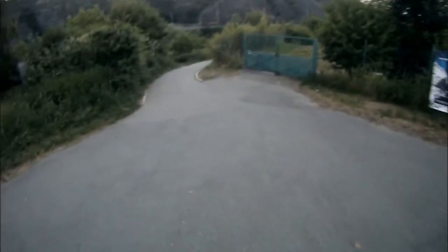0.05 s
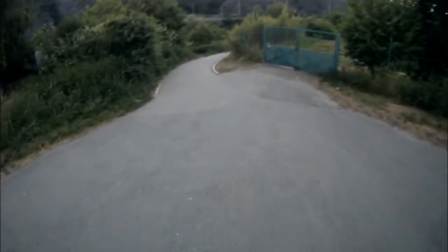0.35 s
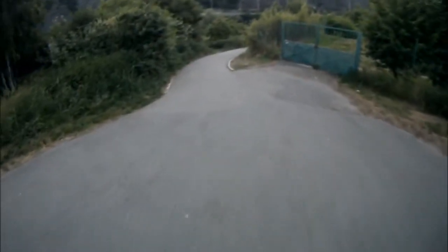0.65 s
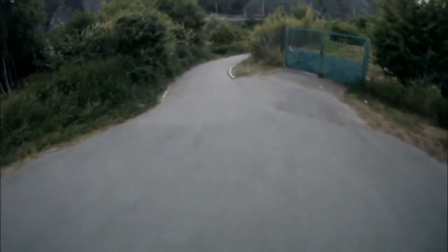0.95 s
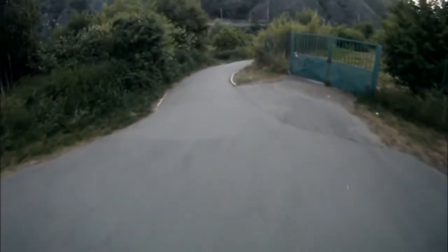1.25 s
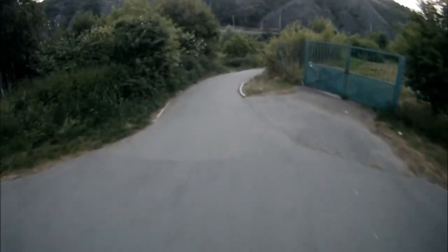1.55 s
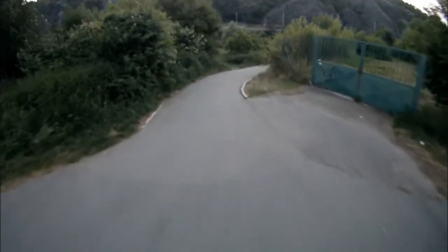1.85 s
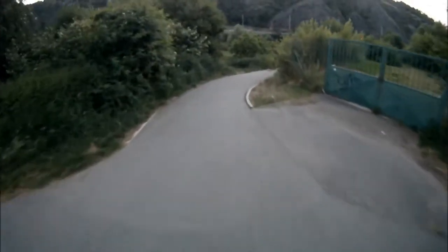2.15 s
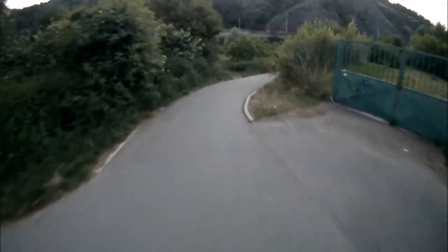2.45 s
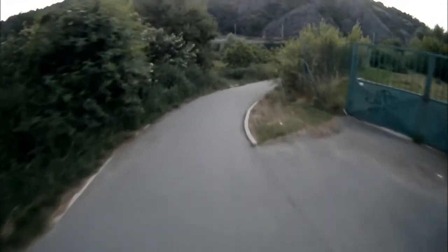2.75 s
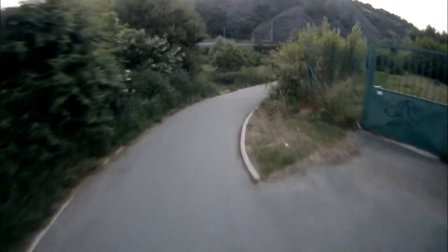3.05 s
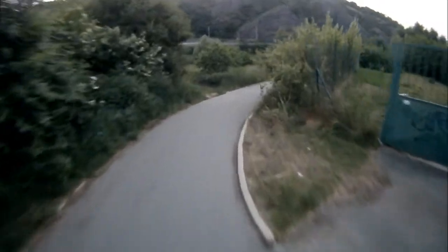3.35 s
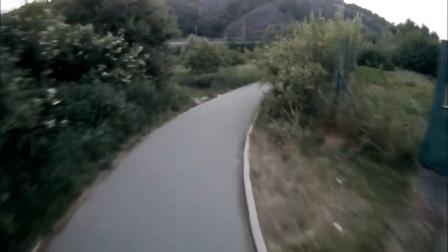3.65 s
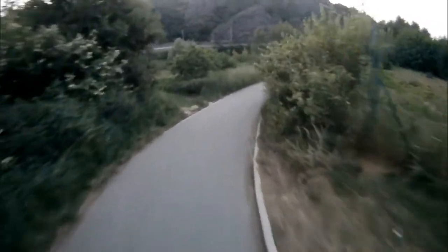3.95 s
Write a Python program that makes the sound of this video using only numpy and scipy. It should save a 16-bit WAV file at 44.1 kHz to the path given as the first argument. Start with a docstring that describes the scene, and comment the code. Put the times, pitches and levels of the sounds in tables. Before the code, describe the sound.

Skate wheels roll along an outdoor asphalt path, humming and ticking over grit, with three faint squeaks and a light scuff early on. Wind rumbles on the moving microphone throughout and gusts strongly near the end.

```python
"""Skate wheels roll on asphalt while wind buffets the microphone, with one strong gust near the end.
The wheels hum and rasp on the road grain, crackle and tick over grit and seams,
scuff sideways for a moment and squeak faintly three times.
The recorder samples slowly and holds each sample, mirroring the sound thinly into the treble."""
import sys
import numpy as np
from scipy import signal
from scipy.fft import rfft, irfft
from scipy.io import wavfile
from scipy.ndimage import uniform_filter1d

SR = 44100
rng = np.random.default_rng(int(sys.argv[2]) if len(sys.argv) > 2 else 0)


def waveform_to_disk(signal):
    """Save audio, clipped to [-1, 1], as 16-bit WAV at the path in sys.argv[1]."""
    frames = np.transpose(np.atleast_2d(signal))
    scaled = np.clip(frames, -1, 1) * 32767
    samples = np.round(scaled).astype(np.int16)
    wavfile.write(sys.argv[1], SR, samples)


N = 4 * SR

# All table levels are relative.
# wheels on road grain (time [s], hum level [dB], rasp level [dB])
ROLL_LEVELS = [(0, -59.5, -62), (.45, -55.5, -64.5), (.8, -54, -59), (1.1, -54.5, -60.5), (1.4, -54, -63.5),
               (1.75, -52, -63), (2.1, -47, -59.5), (2.5, -48, -60.5), (2.8, -45.5, -59), (3.15, -48, -62),
               (3.5, -49.5, -61.5), (4, -47, -62.5)]
# wheel hum (frequency [Hz], density [dB])
HUM_SPECTRUM = [(100, -5.5), (220, 2), (370, -5), (480, -0.5), (610, -2.5), (760, -14.5), (1100, -24.5),
                (2000, -41)]
# road rasp (frequency [Hz], density [dB])
RASP_SPECTRUM = [(500, -0.5), (1000, -0.5), (1400, -2.5), (1900, -6), (2400, -3), (3200, -5.5), (3900, -13),
                 (4700, -12), (5500, -15.5)]
# wind pressure on the microphone (time [s], level [dB])
GUST_LEVELS = [(0, -35), (.04, -43.5), (.2, -41.5), (.28, -40), (.37, -40.5), (.4, -49.5), (.6, -46.5),
               (.74, -42), (.78, -46.5), (.86, -38), (.92, -45.5), (1.08, -43), (1.15, -44.5), (1.31, -35),
               (1.42, -40.5), (1.52, -43), (1.57, -37.5), (1.66, -40), (1.89, -35), (1.94, -43.5),
               (2.24, -40), (2.35, -46), (2.56, -47), (2.61, -40.5), (2.66, -45), (2.9, -43.5), (3.03, -37),
               (3.12, -42), (3.155, -33), (3.18, -39.5), (3.33, -44.5), (3.41, -27), (3.445, -33.5),
               (3.53, -26.5), (3.61, -24.5), (3.68, -31.5), (3.72, -23.5), (3.76, -34), (3.83, -30.5),
               (3.87, -41), (3.91, -31), (4, -46)]
# buffeting (frequency [Hz], density [dB])
WIND_SPECTRUM = [(20, -6), (35, -2), (60, 1.5), (100, -2), (160, -5), (280, -17.5), (450, -28), (800, -51),
                 (2000, -50)]
# fine grit under the wheels (time [s], level [dB])
GRIT_LEVELS = [(0, -81), (.45, -88), (.7, -77), (1.3, -74.5), (1.45, -77), (1.75, -81), (1.95, -70.5),
               (2.85, -76), (3.1, -97), (4, -84)]
# grit crackle (frequency [Hz], density [dB])
GRIT_SPECTRUM = [(1500, -16), (2600, -4), (3700, -7.5), (4700, 5), (5600, -17)]
# wheel squeaks (start [s], length [s], starting pitch [Hz], level [dB])
SQUEAK_EVENTS = [(.015, .18, 2480, -53.5), (.675, .14, 2230, -61), (.955, .17, 2370, -59.5)]
# squeak partials (pitch ratio [1], level [dB])
SQUEAK_PARTIALS = [(1, 0), (1.345, -13)]
# sideways sliding (time [s], level [dB])
SCUFF_LEVELS = [(0, -96), (.15, -70), (.3, -105), (.5, -74), (.6, -64), (.76, -62.5), (.86, -71.5),
                (1.04, -65), (1.18, -74), (1.3, -66.5), (1.45, -87), (4, -97)]
# sliding hiss (frequency [Hz], density [dB])
SCUFF_SPECTRUM = [(800, -12), (1700, -16), (2300, 2), (2850, 7), (3300, 7), (3700, -4.5), (4800, -17),
                  (5600, -23)]
# hits on stones and seams (time [s], knock level [dB], tick level [dB])
IMPACTS = [(0.468, -47, -55), (.479, -48, -56), (0.596, -47, -45), (0.622, -63, -45), (0.693, -53, -51),
           (0.704, -43.5, -60), (0.915, -41, -63), (1.021, -47, -44.5), (1.048, -65, -47),
           (1.077, -67, -41.5), (1.142, -67, -44.5), (1.247, -56, -47.5), (1.317, -50, -45),
           (1.463, -56, -45.5), (1.935, -45, -52), (1.96, -37, -52), (1.964, -61, -46), (1.989, -57, -43),
           (2.25, -47, -47), (2.291, -41, -58), (2.372, -51, -49), (2.508, -51, -49.5), (2.597, -52, -56),
           (2.644, -67, -45.5), (2.702, -59, -51), (2.745, -43, -42.5), (2.957, -46, -47),
           (3.448, -55, -50)]
# dull wheel knock (frequency [Hz], density [dB])
KNOCK_SPECTRUM = [(300, -26), (600, -1.5), (1100, 8.5), (1500, -12), (2100, 6), (3000, -13), (5000, -14)]
# bright tick (frequency [Hz], density [dB])
TICK_SPECTRUM = [(1000, -20), (2200, -46), (3100, 26), (3900, 15.5), (4700, 12), (5600, 8.5)]


def from_db(db):
    """Decibels to gain."""
    return 10 ** (np.asarray(db) / 20)


def unit_rms(x):
    """Scale to RMS 1."""
    return x / np.sqrt(np.mean(x ** 2) + 1e-20)


def per_sample(table):
    """Each level column, interpolated to every sample."""
    times_s, *columns = np.transpose(table)
    return [np.interp(np.arange(N) / SR, times_s, column) for column in columns]


def density_db(spectrum, hz):
    """Read a spectrum on a log-frequency axis."""
    points_hz, points_db = np.transpose(spectrum)
    return np.interp(np.log(np.maximum(hz, 1)), np.log(points_hz), points_db)


def coloured(x, spectrum):
    """Filter by a spectrum, rolled off beyond its ends; RMS 1."""
    hz = np.arange(N // 2 + 1) * SR / N
    low_skirt = 1 / (1 + (spectrum[0][0] / 2 / (hz + 1)) ** 2)
    high_skirt = 1 / (1 + (hz / 2 / spectrum[-1][0]) ** 2)
    gain = from_db(density_db(spectrum, hz)) * low_skirt * high_skirt
    return unit_rms(irfft(rfft(x) * gain, N))


def noise(spectrum):
    """Coloured noise; RMS 1."""
    return coloured(rng.standard_normal(N), spectrum)


def drift(corner_hz):
    """Low-passed random wander; RMS 1."""
    hz = np.arange(N // 2 + 1) * SR / N
    return unit_rms(irfft(rfft(rng.standard_normal(N)) / (1 + (hz / corner_hz) ** 2), N))


def decay(hits, t60_s):
    """Give each impulse an exponential tail."""
    return signal.lfilter([1], [1, -from_db(-60 / (t60_s * SR))], hits + 1e-18)


def rolling(grains_per_s=900, spread_db=1.5):
    """Countless tiny impacts on the asphalt grain make the wheels hum and rasp."""
    hum_db, rasp_db = per_sample(ROLL_LEVELS)
    sizes = from_db(spread_db * np.minimum(rng.exponential(1, N), 5))
    signs = rng.choice([-1, 1], N)
    hits = sizes * signs * (rng.random(N) < grains_per_s / SR)
    texture = from_db(-7) * coloured(hits, RASP_SPECTRUM) + from_db(-.5) * noise(RASP_SPECTRUM)
    hum = from_db(hum_db + 1.03 * drift(45)) * noise(HUM_SPECTRUM)
    rasp = from_db(rasp_db + .88 * drift(28)) * texture
    return hum + rasp


def wind(knee_hz=134, neutral_gust_db=-32.5, flutter_db=1.5, skew=.029, gain_db=1.5):
    """Eddies on the microphone, in half-octave bands; stronger gusts are louder and brighter."""
    gust_db, = per_sample(GUST_LEVELS)
    tilt_db_per_octave = .24 * (gust_db - neutral_gust_db)
    edges_hz = 20 * 2 ** np.arange(0, 7, .5)
    flutter = drift(30)
    eddies = np.zeros(N)
    for low_hz, high_hz in zip(edges_hz, edges_hz[1:]):
        centre_hz = np.sqrt(low_hz * high_hz)
        bandpass = signal.butter(2, [low_hz, high_hz], "band", fs=SR, output="sos")
        band = signal.sosfilt(bandpass, rng.standard_normal(N + SR))[SR:]
        gain = from_db(density_db(WIND_SPECTRUM, centre_hz)) * np.sqrt(high_hz - low_hz)
        octaves = np.clip(np.log2(centre_hz / knee_hz), -1, 1.3)
        eddies += gain * unit_rms(band) * from_db(tilt_db_per_octave * octaves + flutter_db * flutter)
    eddies = signal.sosfilt(signal.butter(2, 700, fs=SR, output="sos"), eddies)
    steady = eddies / np.sqrt(uniform_filter1d(eddies ** 2, size=4000) + 1e-12)
    skewed = steady + skew * (steady ** 2 - 1)  # peaks sharper than troughs
    pressure = skewed * from_db(gust_db + gain_db)
    return signal.sosfilt(signal.butter(2, 24, "high", fs=SR, output="sos"), pressure)


def grit(cracks_per_s=300, spread_db=2):
    """Small stones crack under the wheels at random."""
    level_db, = per_sample(GRIT_LEVELS)
    sizes = from_db(spread_db * np.minimum(rng.exponential(1, N), 3))
    hits = sizes * (rng.random(N) < cracks_per_s / SR)
    return from_db(level_db) * unit_rms(decay(hits, t60_s=.014)) * noise(GRIT_SPECTRUM)


def squeaks(sag_share=.102, sag_s=.042, jitter_hz=30.4, peak_share=.24, flutter_db=1.5):
    """Thin, unsteady wheel whistles that swell, sag in pitch and fade."""
    out = np.zeros(N)
    for start_s, length_s, start_hz, level_db in SQUEAK_EVENTS:
        age_s = np.clip(np.arange(N) / SR - start_s, 0, length_s)
        pitch_hz = start_hz * (1 - sag_share * (1 - np.exp(-age_s / sag_s)))
        swell = np.interp(age_s / length_s, [0, peak_share, 1], [0, 1, 0])
        for ratio, partial_db in SQUEAK_PARTIALS:
            partial_hz = ratio * (pitch_hz + jitter_hz * drift(130))
            phase = 2 * np.pi * np.cumsum(partial_hz) / SR
            out += from_db(level_db + partial_db + flutter_db * drift(60)) * swell * np.sin(phase)
    return out


def scuffing(roughness_db=4.3, roughness_hz=110):
    """Wheels slide sideways on the road with a rough hiss."""
    level_db, = per_sample(SCUFF_LEVELS)
    return from_db(level_db + roughness_db * drift(roughness_hz)) * noise(SCUFF_SPECTRUM)


def bursts(times_s, levels_db, spectrum, t60_s):
    """Noise bursts with a sudden onset and exponential decay."""
    hits = np.zeros(N)
    hits[(times_s * SR).astype(int)] = from_db(levels_db)
    crunch = noise(spectrum)
    steady = crunch / np.sqrt(uniform_filter1d(crunch ** 2, size=130) + 1e-9)
    return decay(hits, t60_s) * steady


def impacts():
    """Each stone or seam gives a dull wheel knock and a bright tick."""
    times_s, knock_db, tick_db = np.transpose(IMPACTS)
    knocks = bursts(times_s, knock_db - 5, KNOCK_SPECTRUM, t60_s=.024)
    ticks = bursts(times_s, tick_db - 8, TICK_SPECTRUM, t60_s=.022)
    return knocks + ticks


def scene():
    """Wheels and wind at one microphone in open air."""
    return (rolling() + wind() + grit() + squeaks() + scuffing() + impacts())[None]


def record(dry, input_edge_hz=5523, hold_rate_hz=12000, output_edge_hz=15400):
    """Band-limit, sample slowly and hold; the steps add treble images, whose top is cut."""
    narrow = signal.sosfilt(signal.cheby1(10, .2, input_edge_hz, fs=SR, output="sos"), dry)
    slow = signal.resample(narrow, N * hold_rate_hz // SR, axis=1)
    held = signal.resample(np.repeat(slow, 4, axis=1), N, axis=1)
    return signal.sosfilt(signal.ellip(10, .2, 70, output_edge_hz, fs=SR, output="sos"), held)


dry = scene()
out = record(dry)
waveform_to_disk(out)
```